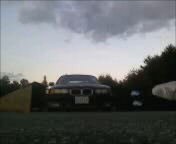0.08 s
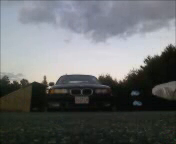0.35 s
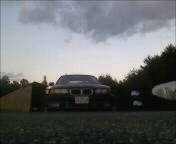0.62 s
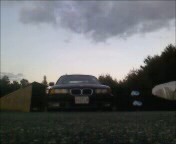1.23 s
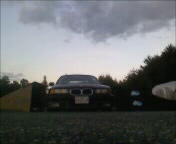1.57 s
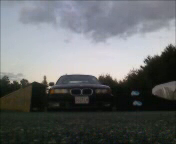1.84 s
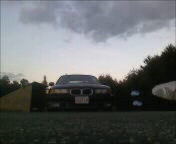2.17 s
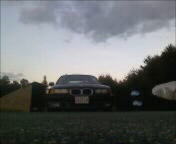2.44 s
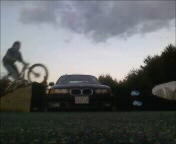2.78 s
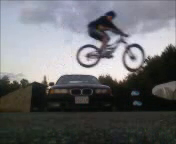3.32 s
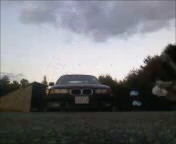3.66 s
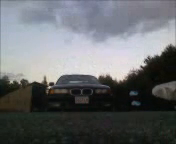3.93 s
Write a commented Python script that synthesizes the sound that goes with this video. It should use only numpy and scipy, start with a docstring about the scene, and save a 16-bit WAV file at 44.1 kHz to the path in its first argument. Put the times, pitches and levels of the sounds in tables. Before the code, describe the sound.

A bicycle jump outdoors: knocking ramp boards, rattling chain, then a hard landing over faint wind.

```python
"""Faint wind and a low hum like an idling engine are heard first, with thin far-off chirps.
A bike coasts nearer, freewheel whirring, and meets a wooden ramp: both wheels excite the modes of the
hollow boards, and the chain and frame clank. It flies over a parked car and lands hard on one wheel,
then the other. The impacts overload a small narrow-band camera on the ground."""
import sys
import numpy as np
from scipy import signal
from scipy.fft import rfft, irfft
from scipy.io import wavfile
from scipy.ndimage import uniform_filter1d

SR = 44100
rng = np.random.default_rng(int(sys.argv[2]) if len(sys.argv) > 2 else 0)


def wav_out(sig):
    """Save sig, one row per channel (or a flat mono array), as 16-bit PCM at SR to the path in sys.argv[1]."""
    wavfile.write(sys.argv[1], SR, np.round(np.clip(np.atleast_2d(sig).T, -1, 1) * 32767).astype(np.int16))


N = 176400

# Noise spectra: f/Hz, relative level/dB
WIND_SPECTRUM = [(25, -32), (42, -12.5), (62, -7), (120, 6), (185, -2), (270, -9.5), (400, -13),
                 (600, -22.5), (900, -24.5), (1500, -38.5)]
HISS_SPECTRUM = [(400, 0.5), (900, -1), (1700, -2), (2300, 0.5), (2800, -4), (3350, -2), (4000, -10)]
DRONE_SPECTRUM = [(230, -7.5), (300, -2), (380, -3.5), (465, -1), (560, -10.5), (800, -16), (1100, -26.5)]
PAWL_SPECTRUM = [(500, -13.5), (1500, -16.5), (2100, -10.5), (2600, -3), (2950, -2.5), (3200, -6.5),
                 (3600, -17)]
CHAIN_SPECTRUM = [(200, 3), (600, 3), (1100, 0.5), (1800, -2), (2600, -2), (3300, -7.5), (4000, -20.5)]
SCUFF_SPECTRUM = [(40, -22), (90, -7), (300, 7), (480, -3.5), (630, -11.5), (735, -2), (920, -14.5),
                  (1100, -12), (1300, -19), (1700, -16), (2500, -21), (3600, -28)]
CRUNCH_SPECTRUM = [(30, -28), (70, -6), (140, 0), (300, 0.5), (430, 0), (600, -5), (790, -7.5), (900, -13),
                   (1080, -7), (1280, -12), (1400, -12.5), (1600, -13), (2100, -20), (3200, -21.5),
                   (4200, -35.5)]
# Envelopes of the sustained sounds: t/s, level/dB
WIND_ENVELOPE = [(0, -51), (.6, -50.5), (1, -53), (1.6, -48), (2.2, -50.5), (3, -49), (4, -53)]
DRONE_ENVELOPE = [(0, -60.5), (.35, -61), (.68, -53), (.9, -66.5), (1.25, -61), (1.65, -61), (1.9, -61.5),
                  (2.5, -60.5), (4, -67.5)]
HUM_ENVELOPE = [(0, -56), (.18, -45), (.8, -50.5), (.93, -44.5), (1.07, -55), (1.2, -43), (1.7, -46.5),
                (2.27, -49.5), (2.55, -39.5), (2.95, -38), (3.01, -49), (3.07, -39), (3.6, -42), (3.8, -39),
                (4, -43)]
OCTAVE_ENVELOPE = [(0, -58), (.55, -60), (.85, -55), (1.25, -54), (1.6, -65.5), (2.2, -56.5), (2.55, -58),
                   (3.1, -67), (4, -65)]
FREEWHEEL_ENVELOPE = [(0, -75), (1.8, -73), (2.28, -64.5), (2.37, -61), (2.47, -54), (2.6, -54.5),
                      (3.0, -56), (3.1, -53.5), (3.25, -54.5), (3.5, -46), (3.65, -49), (4, -45)]
# Far-off chirping voices: f/Hz, level/dB
CHIRP_VOICES = [(2280, -63), (3300, -63.5)]
# Pitch of the whine in flight: t/s, f/Hz
WHINE_GLIDE = [(3.06, 429), (3.2, 470), (3.35, 478)]
# Chain ticks on the approach: t/s, level/dB
CHAIN_TICKS = [(.808, -53), (1.9, -56.5), (1.945, -56), (1.988, -55), (2.08, -50.5), (2.125, -55.5),
               (2.347, -51.5)]
# Chain slaps: t/s, level/dB, T60/s, relative frame ring/dB, tilt/(dB per octave)
CHAIN_SLAPS = [(2.661, -28.5, 0.12, -13, 4), (2.73, -24, 0.24, 5.5, -1.5), (2.735, -24.5, .08, 13.5, 0),
               (2.754, -21.5, 0.16, 5, -3.5), (2.802, -34, 0.29, 6, 0), (2.831, -28.5, 0.11, -1, -0.5),
               (2.866, -32, 0.25, -17, -4), (2.923, -31, .2, -3, -2), (2.954, -44, .12, -12, 2),
               (2.986, -35.5, 0.068, -6, 10.5), (3.422, -54, .06, 8, -3), (3.678, -7, .08, -1, -1),
               (3.724, -19, 0.11, 5, 23), (3.786, -13, 0.07, -10, 12.5), (3.812, -12, 0.23, -11, -12),
               (3.843, -23, 0.1, -13, 8.5), (3.881, -25.5, 0.093, -15, 9), (3.921, -32.5, 0.45, -15, -7),
               (3.959, -30, 0.075, -11, 15.5), (3.984, -39, 0.17, -26, -5)]
# Normal modes of the frame and of the hollow ramp: f/Hz, relative level/dB, T60/s
FRAME_MODES = [(1079, -6, 0.085), (1404, -8, 0.039), (1650, -5, 0.037), (1723, -5, 0.063),
               (1819, -1, 0.048), (2090, -13.5, 0.083), (2375, -13, 0.05), (2940, -29.5, 0.071)]
RAMP_MODES = [(81.9, -6.5, 0.35), (119, -12.5, 0.31), (142, 0.5, .05), (161, -4.5, 0.22),
              (261.6, -7.5, 0.18), (335.5, -7.5, 0.081), (426.4, -10, .11), (564, -17.5, .07),
              (721, -11.5, 0.073), (873, -14, 0.063), (1013, -12.5, .08), (1424, -18.5, 0.1),
              (1470, -28, .08)]
# Wheel blows on the ramp: t/s, relative level/dB, contact time/s
RAMP_BLOWS = [(2.6367, 3.5, 0.00092), (2.6434, -2, 0.0034), (2.671, -9, 0.0036), (2.686, -12, .003),
              (2.724, -17, 0.0039), (2.7835, 1, 0.0017), (2.7906, -0.5, .004), (2.805, -12, 0.0086),
              (2.862, -18, .003), (2.926, -25.5, 0.00077)]
# Tyre contacts with the boards and with the ground: t/s, level/dB, rise/s, T60/s
BOARD_SCUFFS = [(2.629, -16.5, 0.0046, 0.073), (2.636, -9, .0015, 0.044), (2.68, -27.5, 0.023, 0.59),
                (2.751, -22, 0.0069, 0.079), (2.779, -15.5, 0.0028, 0.083), (2.784, -10.5, 0.0015, 0.057),
                (2.82, -23, 0.019, 0.29)]
GROUND_CRUNCHES = [(3.659, -14, 0.0065, 0.19), (3.668, -2, 0.0087, 0.23), (3.722, -5.5, 0.0028, 0.18),
                   (3.775, -9.5, 0.0022, 0.077), (3.784, -3.5, 0.0024, 0.13), (3.81, -7, 0.0043, 0.26),
                   (3.889, -17.5, 0.0035, 0.085), (3.938, -31, 0.005, 0.21)]
# Wheel booms on landing: t/s, level/dB, f/Hz, T60/s
WHEEL_BOOMS = [(3.669, -1, 321.5, 0.18), (3.692, -3.5, 274.9, 0.21), (3.748, -7, 151, 0.095),
               (3.786, -14, 539, .1), (3.798, 1.5, 479.8, .13), (3.814, -4, 352.6, .2),
               (3.895, -12, 145.7, 0.13)]
# Normal modes of a wheel: ratio to the boom's frequency, relative level/dB
WHEEL_MODES = [(0.499, -13.5), (1, -2.5), (1.329, -9.5), (2.3, -18.5)]


def undb(db):
    """Amplitude ratio of a level in decibels."""
    return 10 ** (np.asarray(db) / 20)


def clock():
    """Uniform sampling: the time of each sample in seconds."""
    return np.arange(N) / SR


def curve(rows):
    """Linear interpolation through (t/s, value) points."""
    return np.interp(clock(), *np.array(rows).T)


def wander(rate_hz):
    """A moving average turns random steps into a smooth fluctuation of unit spread."""
    hold = max(int(SR / rate_hz), 1)
    steps = np.repeat(rng.standard_normal(N // hold + 1), hold)
    smooth = uniform_filter1d(steps, hold)[:N]
    return smooth / smooth.std()


def shape(x, spectrum, tilt_db=0):
    """Linear filtering imposes a spectrum and a tilt per octave; the result has unit rms."""
    octave = np.log2(np.maximum(np.fft.rfftfreq(len(x), 1 / SR), 1))
    hz, db = np.array(spectrum).T
    knots = np.log2(hz)
    slope = tilt_db * np.clip(octave, knots[0], knots[-1])
    rolloff = 40 * np.maximum(octave - knots[-1], 0) + 12 * np.maximum(knots[0] - octave, 0)
    shaped = irfft(rfft(x) * undb(np.interp(octave, knots, db) + slope - rolloff), len(x))
    return shaped / shaped.std()


def burst(spectrum, rise, t60, grain_db, tilt_db=0):
    """Many tiny contacts add incoherently to a noise that swells, then decays exponentially."""
    t = np.arange(SR // 2) / SR
    grains = np.repeat(rng.standard_normal(len(t) // 30), 30)
    swarm = shape(rng.standard_normal(len(t)) * undb(grain_db * grains), spectrum, tilt_db)
    return swarm * np.minimum(t / rise, 1) * undb(-60 * np.maximum(t - rise, 0) / t60)


def ring(modes, rise):
    """Free vibration is a sum of damped modes, here built up over a short rise."""
    t = np.arange(SR) / SR
    vibration = sum(undb(db - 60 * t / t60) * np.sin(2 * np.pi * hz * t) for hz, db, t60 in modes)
    return (1 - np.exp(-t / rise)) * vibration


def add(out, start, sound):
    """Superpose a sound from its start time on."""
    i = min(int(start * SR), N)
    out[i:i + len(sound)] += sound[:N - i]


def wind():
    """Amplitude-modulated noise: light air rumbles and flickers over a smooth hiss."""
    gusts = undb(curve(WIND_ENVELOPE) - 0.5 * wander(4.14) + 1.27 * wander(15))
    rumble = gusts * shape(rng.standard_normal(N), WIND_SPECTRUM)
    hiss = undb(-61 + .5 * wander(26)) * shape(rng.standard_normal(N), HISS_SPECTRUM)
    return rumble + hiss


def drone():
    """Band-limited noise swells and fades as a distant rush, perhaps traffic."""
    return undb(curve(DRONE_ENVELOPE)) * shape(rng.standard_normal(N), DRONE_SPECTRUM)


def chirps():
    """Frequency modulation makes short, rough, falling chirps, perhaps of distant insects."""
    length_s, mean_gap_s = .08, .16
    out, count = np.zeros(N), int(N / SR / mean_gap_s)
    progress = np.arange(int(length_s * SR)) / (length_s * SR)
    envelope = np.sin(np.pi * progress)
    for hz, db in CHIRP_VOICES:
        roughness = wander(400)
        for k, (late, detune, strength) in enumerate(rng.standard_normal((count, 3))):
            start = (k + np.clip(.5 + .3 * late, 0, 1)) * mean_gap_s
            jitter = np.roll(roughness, -int(start * SR))[:len(progress)]
            pitch = hz * (1 + .02 * detune - .03 * (progress - .5) + .012 * jitter)
            tone = np.sin(2 * np.pi * np.cumsum(pitch) / SR)
            add(out, start, undb(db + 2.5 * strength) * envelope * tone)
    return out


def hum(pitch_hz=109.1):
    """Two harmonics, a fundamental and its weak octave, drift together as a low hum."""
    phase = 2 * np.pi * np.cumsum(pitch_hz * (1 + .008 * wander(9))) / SR
    fundamental = undb(curve(HUM_ENVELOPE)) * np.sin(phase)
    octave = undb(curve(OCTAVE_ENVELOPE) + 0.74 * wander(15)) * np.sin(2 * phase)
    return np.sqrt(2) * (fundamental + octave)


def whine(rms_db=-58, fade_s=0.032):
    """A frequency glide: one faint pure tone rises while the bike is in the air."""
    t, start, end = clock(), WHINE_GLIDE[0][0], WHINE_GLIDE[-1][0]
    gate = np.clip(np.minimum(t - start, end - t) / fade_s, 0, 1)
    phase = 2 * np.pi * np.cumsum(curve(WHINE_GLIDE)) / SR
    return np.sqrt(2) * undb(rms_db) * gate * np.sin(phase)


def freewheel(pawl_hz=106.6, hub_hz=3037, sag_hz_per_s=130, takeoff_s=2.6):
    """Repeated impulses from the pawls drive the hub's resonance, which sinks as the bike passes."""
    tooth_phase = np.cumsum(pawl_hz * (1 + .04 * wander(3.5))) / SR % 1
    pawls = np.exp(-tooth_phase / 0.81) * undb(2.3 * wander(70))
    centre_hz = hub_hz - sag_hz_per_s * (clock() - takeoff_s)
    pitch = centre_hz * (1 + 0.039 * wander(500))  # fast jitter broadens the resonance
    hub = pawls * np.sin(2 * np.pi * np.cumsum(pitch) / SR)
    rasp = shape(pawls * rng.standard_normal(N), PAWL_SPECTRUM)
    whirr = rasp + undb(-2) * hub / hub.std()
    return whirr * undb(curve(FREEWHEEL_ENVELOPE) + 0.56 * wander(27))


def chain_ticks():
    """Light impacts of the slack chain radiate brief, bright noise."""
    out = np.zeros(N)
    for start, db in CHAIN_TICKS:
        add(out, start, undb(db) * burst(CHAIN_SPECTRUM, rise=0.003, t60=0.11, grain_db=3, tilt_db=12))
    return out


def clanks():
    """Impact excitation: the chain rattles and rings the frame's modes, slightly detuned each time."""
    out = np.zeros(N)
    for start, db, t60, ring_db, tilt_db in CHAIN_SLAPS:
        detune = 1 + 0.011 * rng.standard_normal(len(FRAME_MODES))
        modes = [(hz * d, mode_db, decay) for (hz, mode_db, decay), d in zip(FRAME_MODES, detune)]
        rattle = burst(CHAIN_SPECTRUM, rise=0.003, t60=t60, grain_db=3, tilt_db=tilt_db)
        add(out, start, undb(db) * rattle)
        add(out, start, undb(db + ring_db) * ring(modes, rise=0.001))
    return out


def ramp():
    """Wheels scuff and boom the boards; contact time acts as a low-pass, so longer blows are duller."""
    out = np.zeros(N)
    boards = undb(-10) * ring(RAMP_MODES, rise=.0006)
    for start, db, contact_s in RAMP_BLOWS:
        pole = np.exp(-2 * np.pi / (contact_s * SR))
        add(out, start, undb(db) * signal.lfilter([1 - pole], [1, -pole], boards))
    for start, db, rise, t60 in BOARD_SCUFFS:
        add(out, start, undb(db) * burst(SCUFF_SPECTRUM, rise, t60, grain_db=1))
    return out


def landing():
    """Impact on gritty ground makes granular noise and excites the wheels' inharmonic modes."""
    out = np.zeros(N)
    for start, db, rise, t60 in GROUND_CRUNCHES:
        add(out, start, undb(db) * burst(CRUNCH_SPECTRUM, rise, t60, grain_db=1))
    for start, db, hz, t60 in WHEEL_BOOMS:
        modes = [(hz * ratio, mode_db, t60) for ratio, mode_db in WHEEL_MODES]
        add(out, start, undb(db) * ring(modes, rise=0.0012))
    return out


def scene():
    """Superposition: the pressures of all sources add at one microphone."""
    jump = ramp() + clanks() + landing() + freewheel() + whine()
    background = hum() + wind() + drone() + chirps()
    return (jump + background + chain_ticks())[None]


def record(dry, low_hz=53.7, high_hz=3660, order=11.2, ceiling=.69):
    """Band limiting and saturation: the camera passes a narrow band and flattens the loudest peaks."""
    hz = np.fft.rfftfreq(2 * N, 1 / SR)
    treble_loss = np.sqrt(1 + (hz / high_hz) ** (2 * order))
    dull = irfft(rfft(dry, 2 * N) / treble_loss)[:, :N]
    narrow = signal.sosfilt(signal.butter(3, low_hz, "high", fs=SR, output="sos"), dull)
    clipped = np.clip(narrow, -ceiling, ceiling)
    top_cut = signal.ellip(8, .2, 70, 16000, fs=SR, output="sos")  # trims the highest distortion
    return signal.sosfilt(top_cut, clipped)


dry = scene()
out = record(dry)
wav_out(out)
```